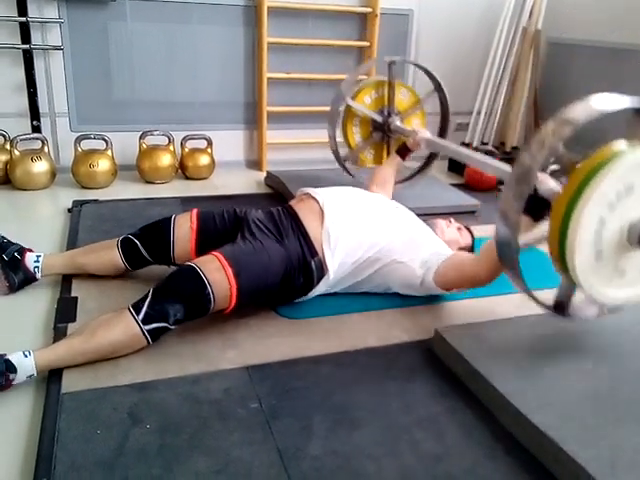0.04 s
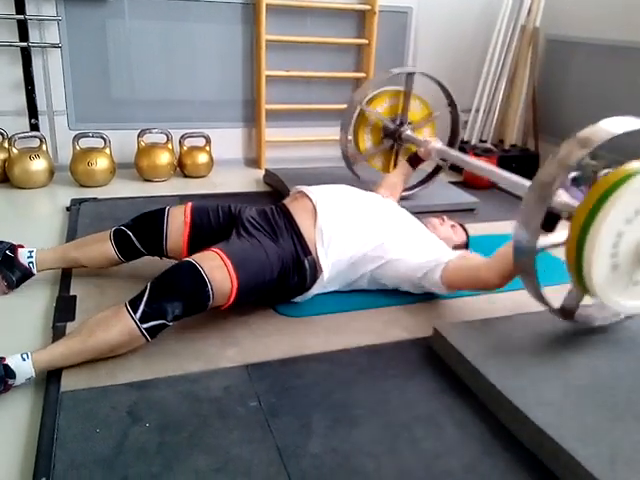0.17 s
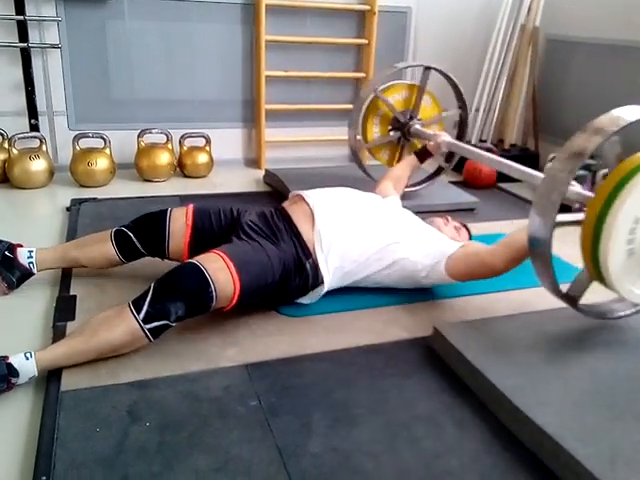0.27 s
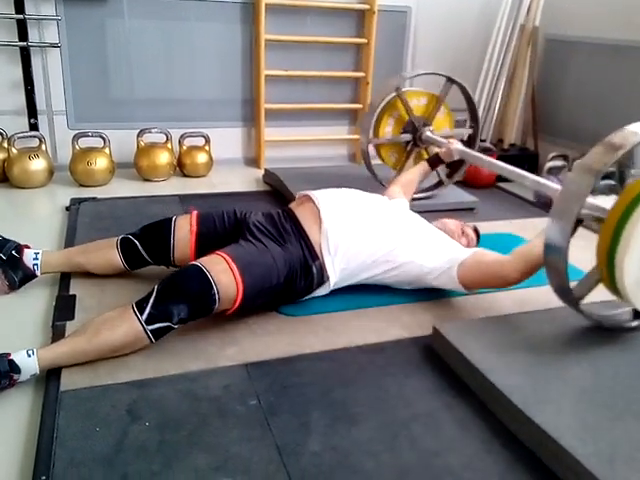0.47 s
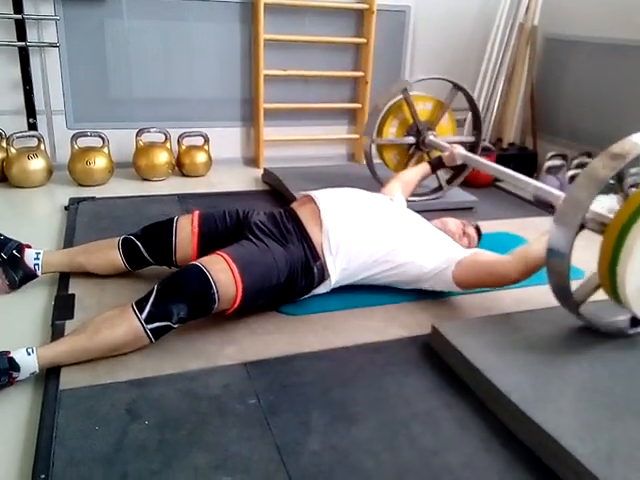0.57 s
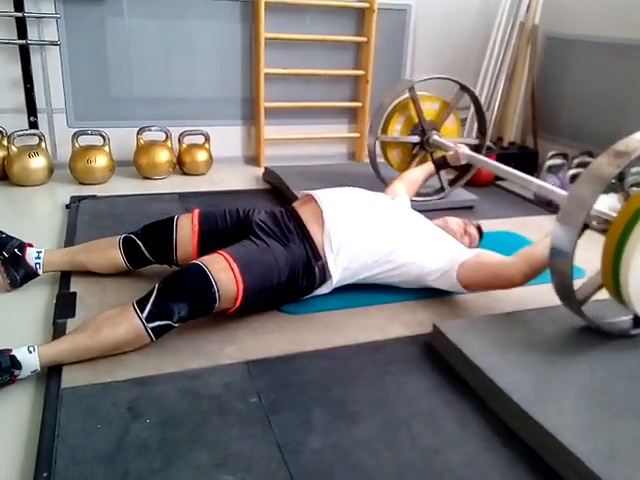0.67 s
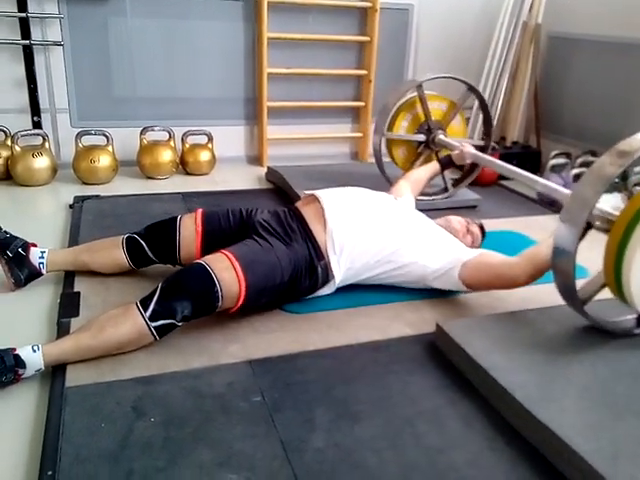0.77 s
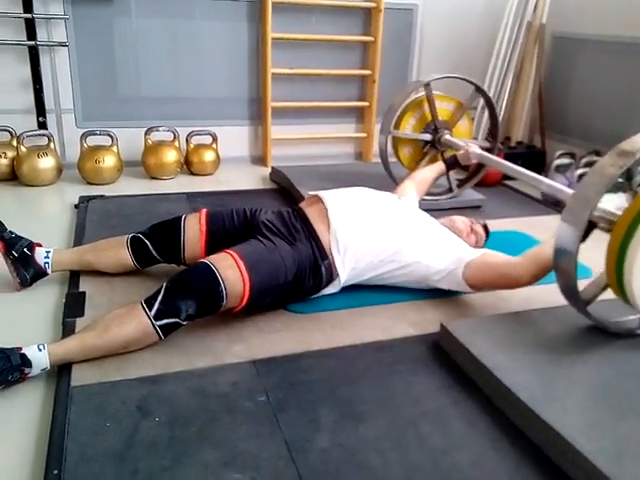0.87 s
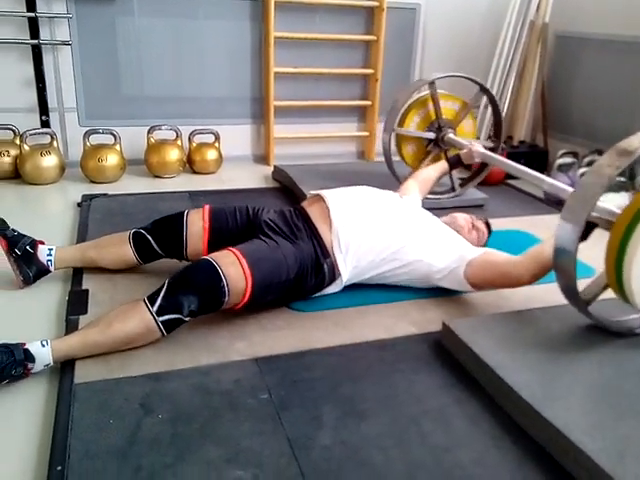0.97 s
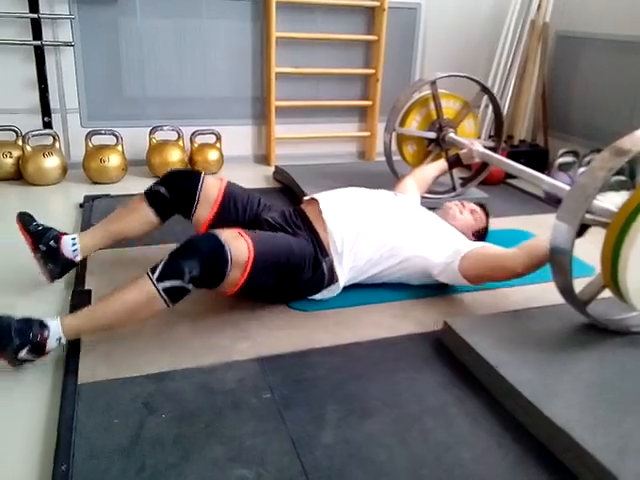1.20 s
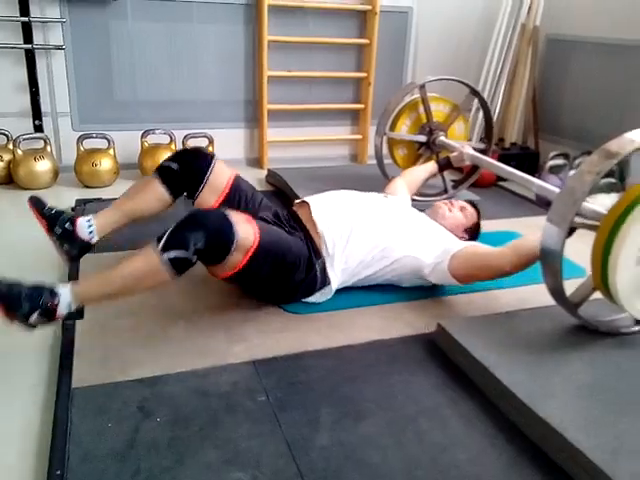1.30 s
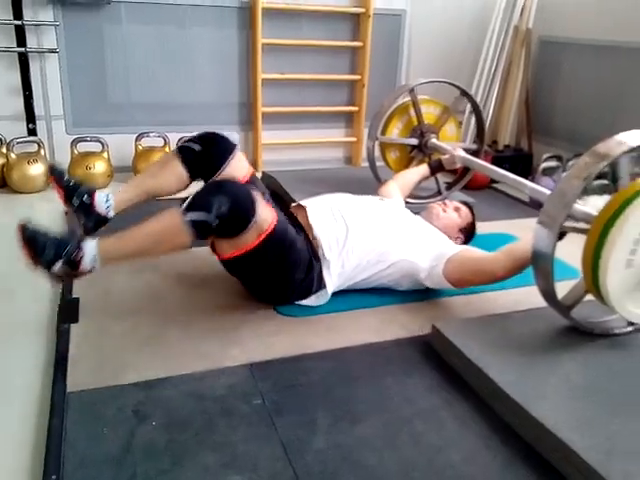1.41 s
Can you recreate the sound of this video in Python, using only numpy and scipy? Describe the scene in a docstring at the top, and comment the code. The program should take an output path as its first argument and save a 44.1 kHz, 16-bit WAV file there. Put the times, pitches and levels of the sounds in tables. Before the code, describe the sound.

In an echoing gym, a heavy barbell lands nearby with a thud and a metal clang, bounces from end to end and settles in a quick, weakening rattle of weight plates while the steel rings on.

```python
"""In a gym, a loaded barbell with steel guard wheels drops, bounces from end to end and rattles to rest.
A sleeve squeaks faintly on the bar as it falls. Then each contact thumps the floor, clashes the
weight plates against the bar and sets the wheels ringing in a long clang. Echoes from the hard walls
draw the sound out, over the faint hush of the room's air."""
import sys
import numpy as np
from scipy import signal
from scipy.fft import irfft, next_fast_len
from scipy.io import wavfile
from scipy.ndimage import map_coordinates

SR = 44100
rng = np.random.default_rng(int(sys.argv[2]) if len(sys.argv) > 2 else 0)


def digitize_waveform(pressure):
    """Quantize a signal to 16-bit integers and store it at the path in sys.argv[1].

    Rows of a 2-D input are taken as channels; values are limited to [-1, 1].
    """
    field = np.atleast_2d(pressure).T
    bounded = np.clip(field, -1, 1)
    quanta = np.round(bounded * 32767).astype(np.int16)
    wavfile.write(sys.argv[1], SR, quanta)


N = 63945

# The barbell's contacts. Each row: start in seconds, floor thump in dB, its extra bass in dB,
# plate clash in dB, its extra treble in dB, wheel ring in dB, name of the landing it belongs to.
CONTACTS = [ (0.2202, -59, -5, -70, 3, -65, "drop"), (0.2352, -33, 9, -46.5, -18, -42, "drop"),
            (0.2402, -22.5, 9, -22.5, -8, -33, "drop"), (0.2429, -22, 1.5, -21.5, 3.5, -20.5, "drop"),
            (0.252, -31.5, 3.5, -20.5, 5, -22, "drop"), (0.2821, -50.5, -6, -30.5, 11.5, -26, "drop"),
            (0.4950, -27.5, 3.5, -32, -9.5, -50, "bounce"), (0.509, -28.5, 4, -25.5, -4, -31, "bounce"),
            (0.5152, -20, 2, -16.5, 0, -15.5, "bounce"), (0.5250, -19, -13, -22, -12.5, -28.5, "bounce"),
            (0.5350, -22.5, -0.5, -24, -0.5, -32, "bounce"),
            (0.5490, -33, -7.5, -27.5, 9.5, -35.5, "bounce"), (0.5750, -32, -6, -32.5, 4, -22, "bounce"),
            (0.6820, -24, -0.5, -20, -19.5, -20, "settle"), (0.6916, -28.5, -3, -17, 3.5, -19, "settle"),
            (0.7150, -27, -2, -28.5, 11.5, -25, "settle"), (0.7301, -32, -3, -20, -2, -28.5, "settle"),
            (0.8050, -37, 10.5, -27.5, -3, -34, "settle"), (0.8153, -35, 3, -23, -4, -20, "settle"),
            (0.8225, -36, 4.5, -28, 0, -25.5, "settle"), (0.8450, -37, 0.5, -30, -3.5, -37, "settle"),
            (0.9503, -40.5, -1, -52, -8, -54.5, "settle"), (1.0020, -39, -1.5, -42.5, -9, -32, "settle"), ]


def amp(db):
    """Turn decibels into a number to multiply by."""
    return 10 ** (np.asarray(db) / 20)


def unit(x):
    """Scale to an average strength (rms) of 1."""
    return x / np.sqrt(np.mean(np.abs(x) ** 2))


def fft_size():
    """A length in samples that covers the scene and is quick to transform."""
    return next_fast_len(N, real=True)


def bins():
    """The frequencies of a spectrum in Hz, never below 1."""
    return np.maximum(np.fft.rfftfreq(fft_size(), 1 / SR), 1)


def along(points_hz, values):
    """Join values with straight lines, giving every octave the same width."""
    return np.interp(np.log(bins()), np.log(points_hz), values)


def colour(table):
    """Turn rows of Hz and dB into a strength for every frequency."""
    hz, db = np.array(table, float).T
    return unit(amp(along(hz, db)))


def noise_spectrum():
    """Every frequency equally strong, each at a random point in its cycle."""
    return np.exp(2j * np.pi * rng.random(len(bins()))) * np.sqrt(fft_size())


def wave(spectrum):
    """Turn a spectrum into sound."""
    return irfft(spectrum, fft_size())[:N]


def fade(t60):
    """A curve that falls by 60 dB in t60 seconds, the fade time."""
    return np.exp(-np.log(1000) * np.arange(N) / SR / max(t60, 1e-3))


def die_away(spectrum, fade_times):
    """Let each band of a spectrum fade at its own rate."""
    hz, t60 = np.array(fade_times, float).T
    bands = np.eye(len(hz))
    return sum(wave(spectrum * along(hz, band)) * fade(seconds) for band, seconds in zip(bands, t60))


def add(out, start, x):
    """Mix a sound in from a start time in seconds."""
    i = int(start * SR)
    out[i:] += x[:N - i]


def air():
    """The quiet air of the gym: a steady, low hush."""
    # The tone of the hush. Each row: frequency in Hz, relative level in dB.
    air_tone = [(25, 6.5), (130, 7), (400, -4), (900, -6), (1500, -3), (2500, -14), (6000, -19.5),
                (9000, -35), (16000, -42.5)]
    return amp(-66) * wave(colour(air_tone) * noise_spectrum())


def squeak():
    """A sleeve squeaks faintly on the bar as it falls: one tone that swells and stops quickly."""
    pitch_hz, peak_s, rise_s, fall_s = 1797, 0.21, 0.048, 0.014
    t = np.arange(N) / SR - peak_s
    swell = np.exp(np.minimum(t / rise_s, -t / fall_s))
    return amp(-61.5) * swell * np.sin(2 * np.pi * pitch_hz * t)


def room_echo(blow):
    """The walls throw a blow back as a wash of echoes that builds fast and fades, top treble first."""
    # How long the room rings. Each row: frequency in Hz, fade time in seconds.
    room_fades = [(60, 0.96), (150, 0.55), (260, 1.05), (400, 1.41), (1200, 1.38), (2500, 1.2),
                  (5500, 0.86), (7500, 0.66), (10500, 0.26)]
    build_s = 0.0019
    build_up = 1 - np.exp(-np.arange(N) / SR / build_s)
    return die_away(blow * noise_spectrum(), room_fades) * build_up


def plates():
    """Each contact thumps and cracks, rings the same crowd of plate tones in a new mix and echoes."""
    # The tone of the floor's thump. Each row: frequency in Hz, relative level in dB.
    thump_tone = [(25, -12.5), (80, -19.5), (105, -3.5), (165, -2), (300, 3), (430, -6.5), (750, -13),
                  (1200, -24), (3000, -37), (7000, -79)]
    # The tone of plates hitting the bar. Each row: frequency in Hz, relative level in dB.
    clash_tone = [(60, -33.5), (250, -17), (600, 2.5), (850, 0), (1080, -2), (1350, -1), (1580, 6),
                  (1760, 3.5), (1930, -5), (2200, -3.5), (2450, 0), (3050, -5), (3550, -4), (4400, -9.5),
                  (5500, -12), (6450, -17), (6750, -25), (7150, -23), (7450, -31.5), (8200, -40.5),
                  (10200, -45), (10800, -41.5), (11300, -55.5), (12300, -67), (16000, -80)]
    # How long the plates ring. Each row: frequency in Hz, fade time in seconds.
    plate_fades = [(200, 0.34), (1500, 0.85), (4000, 0.73), (6200, 0.59), (7500, .55), (10500, 0.34)]
    tones_per_hz, spread_db, contact_s = 0.06, 0.5, 0.0014
    count = len(bins())
    is_ringing = rng.random(count) < tones_per_hz * SR / fft_size()
    plate_tones = unit(is_ringing * amp(spread_db * rng.standard_normal(count)))
    thump, clash = colour(thump_tone), colour(clash_tone)
    treble = along([1400, 5000], [0, 1])  # full above 5000 Hz
    bass = along([130, 260], [1, 0])  # full below 130 Hz
    onset = np.minimum(np.arange(N) / SR / contact_s, 1)
    out = np.zeros(N)
    for start, thump_db, bass_db, clash_db, treble_db, _, _ in CONTACTS:
        steel = clash * amp(clash_db + treble_db * treble)
        floor = thump * amp(thump_db + bass_db * bass)
        blow = np.hypot(steel, floor)  # their energies add up
        crack = wave(blow * noise_spectrum()) * fade(t60=0.08)
        ring = die_away(steel * plate_tones * noise_spectrum(), plate_fades)
        add(out, start, onset * (amp(3.5) * crack + amp(-3.5) * ring + amp(-4.5) * room_echo(blow)))
    return out


def wall_waver():
    """Echoes make a ringing tone waver: their timing drifts at random, their strength less so."""
    drift_hz, hop = 20, 64  # the drift is worked out once every hop samples
    samples = np.arange(N)
    steps = samples[::hop] / SR * drift_hz
    targets = rng.standard_normal((2, 64))
    real, imag = (map_coordinates(row, [steps], order=3, mode="mirror") for row in targets)
    drift = real + 1j * imag
    evened = drift / np.hypot(np.abs(drift), 0.5)
    return np.interp(samples, samples[::hop], unit(evened))


def stored_energy(blows, t60):
    """The energy that a series of blows leaves in the steel as it leaks away."""
    kept_per_sample = np.exp(-2 * np.log(1000) / (t60 * SR))
    return signal.lfilter([1], [1, -kept_per_sample], blows)


def wheels():
    """The long clang: each contact feeds the steel's tones, in a mix set by how the bar lands."""
    # The natural tones of the wheels, plates and bar. Each entry: pitch in Hz.
    pitches = [ 138, 177, 197, 258, 279, 318, 398, 485, 548, 1087, 1177, 1227, 1397, 1431, 1514, 1532, 1556,
               1578, 1622, 1647, 1708, 1788, 2041, 2389, 2444, 2545, 2799, 2880, 3180, 3387, 3542, 3632,
               4070, 4180, 4814, 6051, ]
    # The same tones in the same order. Each row: relative level in dB at the drop, at the bounce
    # and while settling, then fade time in seconds.
    tones = [ (-12, -17.5, -28, 0.37), (-6, -20.5, -14.5, 0.4), (-12.5, -10, -16.5, 0.38),
             (-21, -15, -19, 0.49), (-6.5, -15, -22, 0.65), (-13, -18.5, -20, 1.05),
             (-23.5, -26, -33.5, 3.14), (-12, -17, -29.5, 0.9), (-22, -18, -24, 1.3), (-36, -31, -21, 1.4),
             (-17.5, -31.5, -17, 1.5), (-24, -16, -25, 2.1), (-26, -20, -24, 1.56), (-11.5, -6, -13.5, 1.3),
             (-19, -6.5, -14, .8), (-9, -4.5, -12.5, 1.0), (-5, -12, -10.5, 0.84), (-12.5, -14, -16.5, 1.5),
             (-9.5, -19, -14.5, 0.71), (-11.5, -17, -11, 0.9), (-13, -13, -19, 0.79),
             (-15.5, -20, -21.5, 1.5), (-22, -26, -21, 1.8), (-19, -19, -15.5, 1), (-18.5, -8, -8, 0.67),
             (-13.5, -13.5, -12, 1), (-16.5, -29.5, -17.5, .8), (-15, -39, -10, 0.35), (-29, -27, -22, 1.3),
             (-21.5, -22, -17, 0.32), (-15.5, -30, -19, 0.87), (-13, -27, -20.5, 0.75),
             (-17, -29.5, -29, 1.1), (-31, -31, -25.5, 1.5), (-24, -25, -23, .7), (-35, -39.5, -21, 0.45), ]
    # The names of the three landings, in the order of those levels.
    landings = ["drop", "bounce", "settle"]
    attack_s, waver_db = 0.0015, -3
    early_db, early_fade_s = 3.5, 0.079  # the part of the ring that the floor damps at once
    t = np.arange(N) / SR
    starts, *_, ring_db, landing_names = zip(*CONTACTS)
    start_samples = (np.array(starts) * SR).astype(int)
    landing = [landings.index(name) for name in landing_names]
    soften = np.exp(-1 / (attack_s * SR))
    out = np.zeros(N)
    for hz, (*tone_db, t60) in zip(pitches, tones):
        strengths = amp(np.array(ring_db) + np.array(tone_db)[landing])
        blows = np.bincount(start_samples, strengths ** 2, N)  # a spike of energy at each contact
        energy = stored_energy(blows, t60) + amp(early_db) ** 2 * stored_energy(blows, early_fade_s)
        swing = signal.lfilter([1 - soften], [1, -soften], np.sqrt(energy))
        tone = np.exp(2j * np.pi * (hz * t + rng.random()))
        out += swing * np.imag(tone * (1 + amp(waver_db) * wall_waver()))
    return amp(-1) * out


def scene():
    """The barbell over the quiet air of the gym, the same in both channels."""
    mono = air() + squeak() + wheels() + plates()
    return np.array([mono, mono])


def record(dry):
    """The recorder thins the deep bass and cuts the highest treble."""
    low_cut_hz, bass_leak_db, top_hz = 86.5, -10.5, 16000
    thin = signal.sosfilt(signal.butter(4, low_cut_hz, "high", fs=SR, output="sos"), dry)
    mixed = thin + amp(bass_leak_db) * (dry - thin)
    return signal.sosfilt(signal.ellip(8, 0.2, 70, top_hz, fs=SR, output="sos"), mixed)


dry = scene()
out = record(dry)
digitize_waveform(out)
```